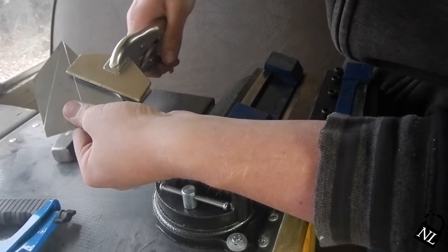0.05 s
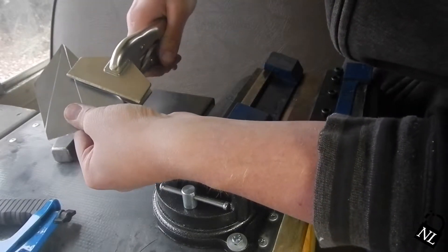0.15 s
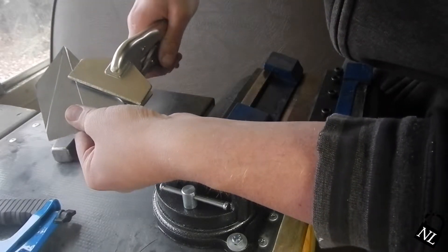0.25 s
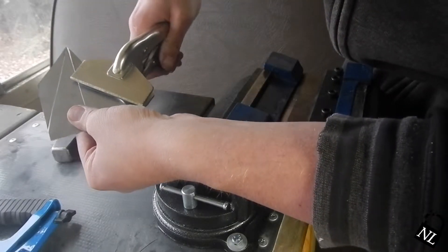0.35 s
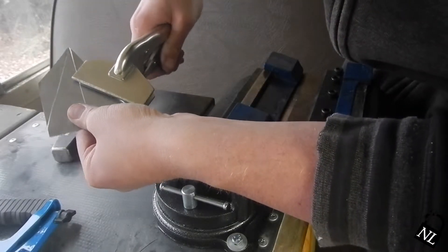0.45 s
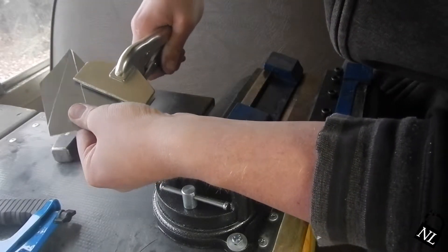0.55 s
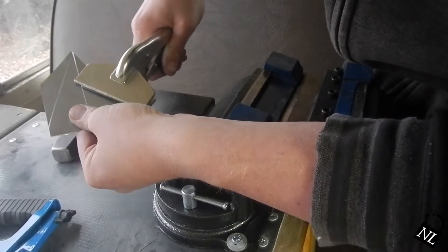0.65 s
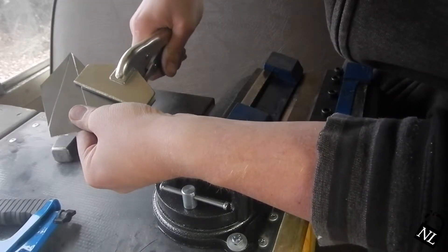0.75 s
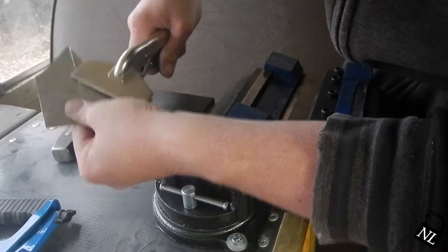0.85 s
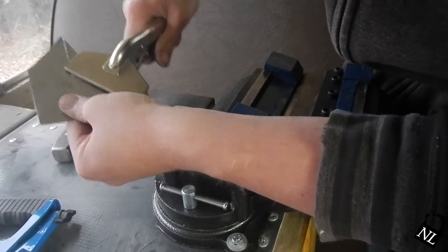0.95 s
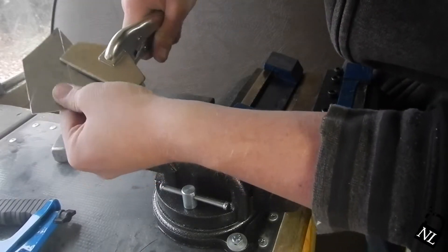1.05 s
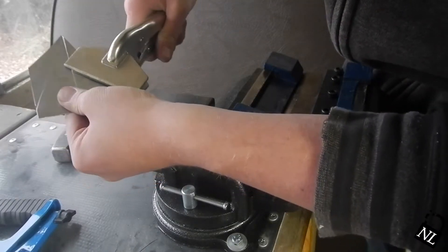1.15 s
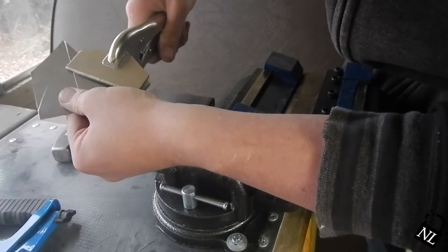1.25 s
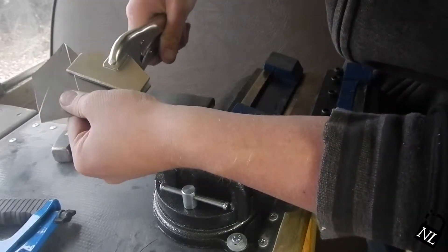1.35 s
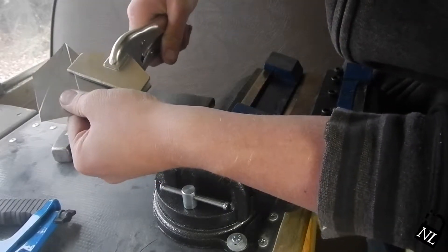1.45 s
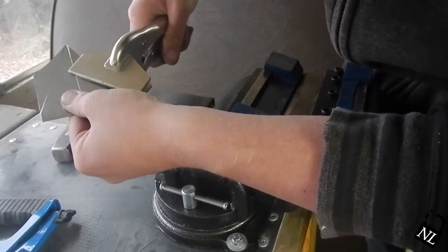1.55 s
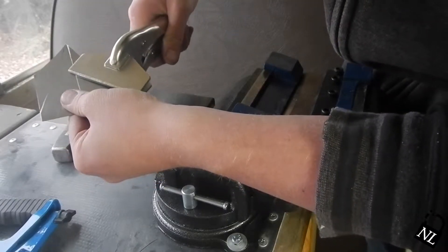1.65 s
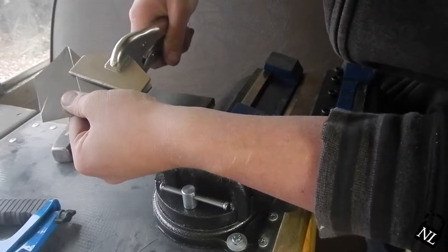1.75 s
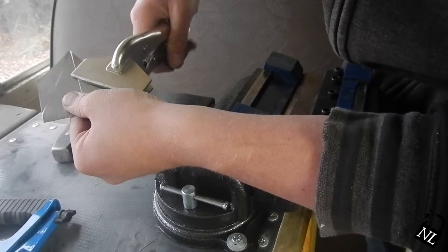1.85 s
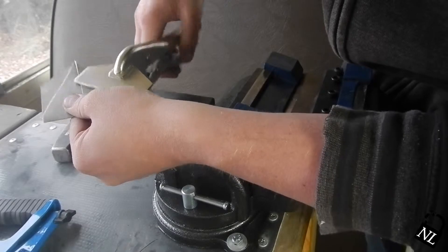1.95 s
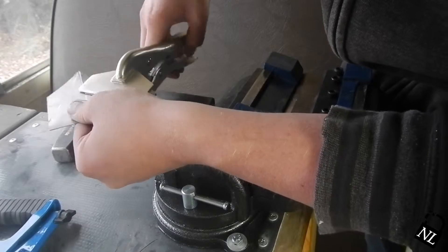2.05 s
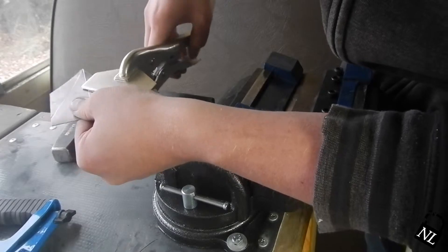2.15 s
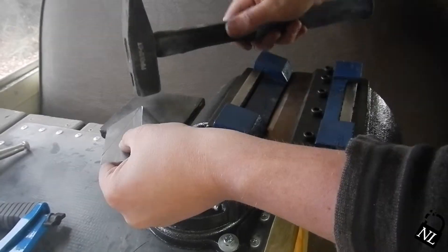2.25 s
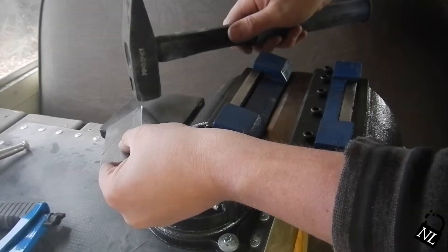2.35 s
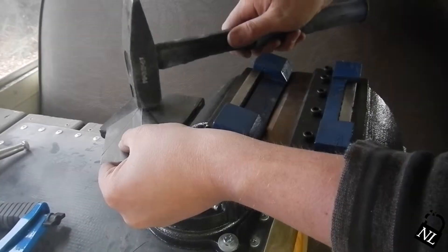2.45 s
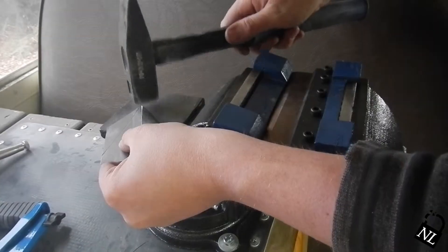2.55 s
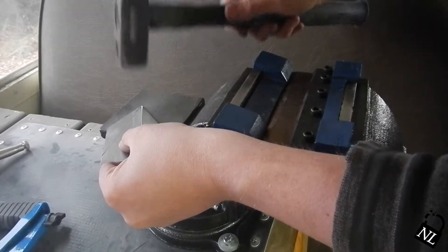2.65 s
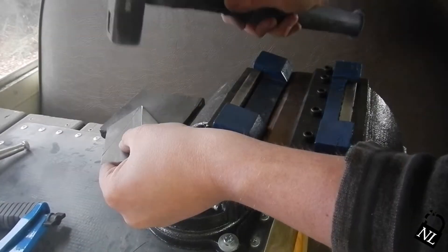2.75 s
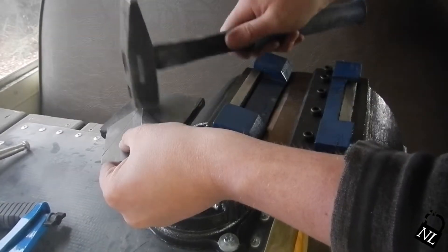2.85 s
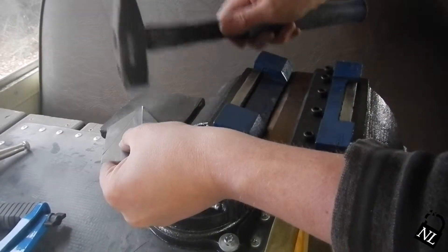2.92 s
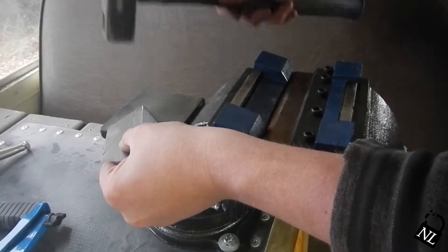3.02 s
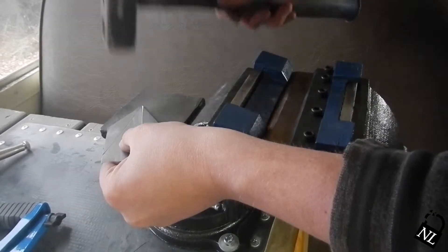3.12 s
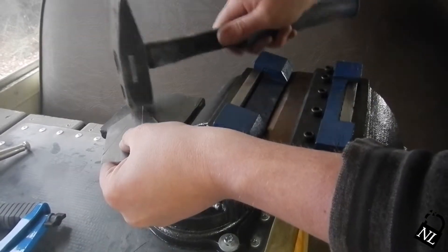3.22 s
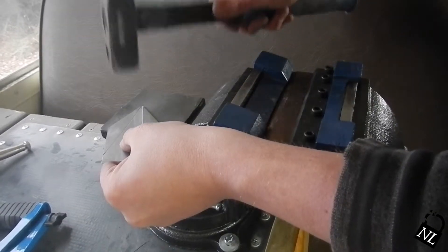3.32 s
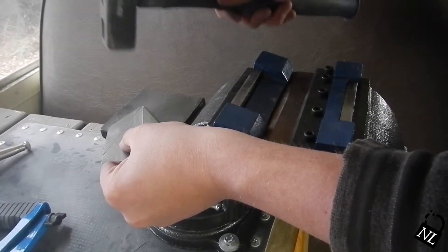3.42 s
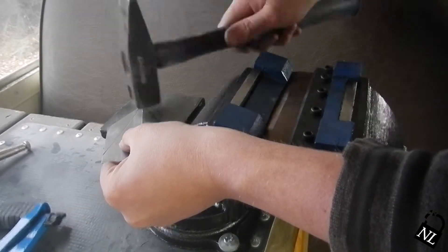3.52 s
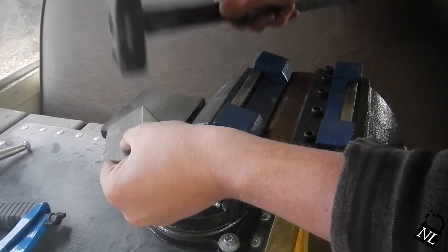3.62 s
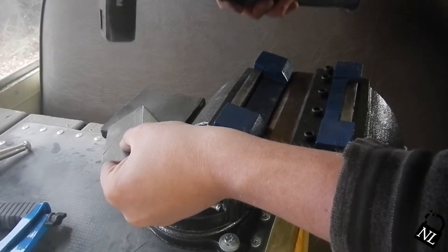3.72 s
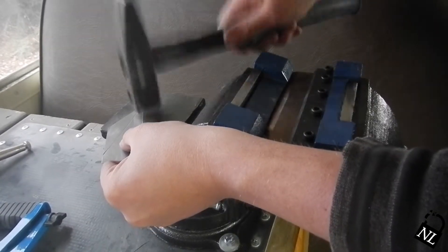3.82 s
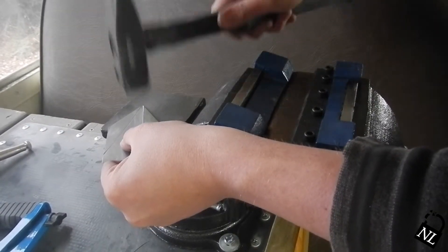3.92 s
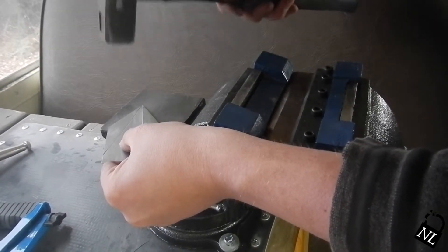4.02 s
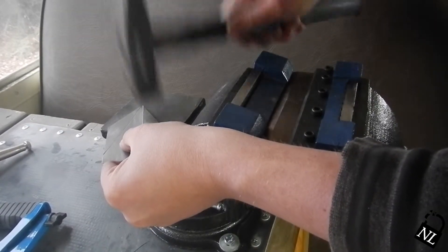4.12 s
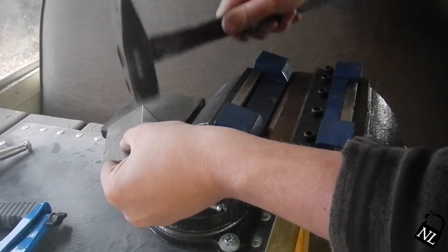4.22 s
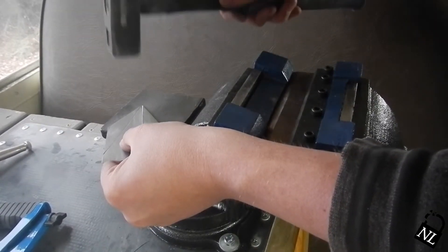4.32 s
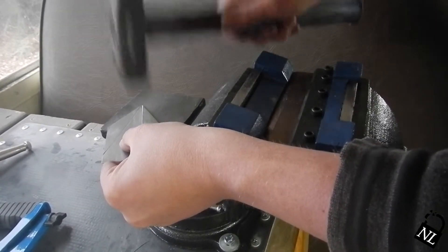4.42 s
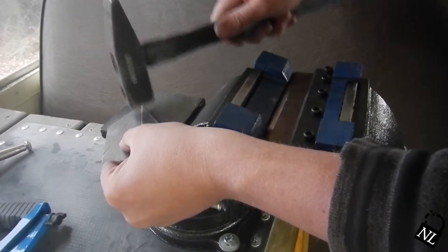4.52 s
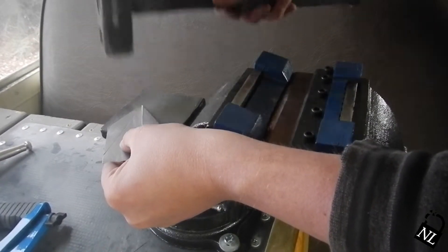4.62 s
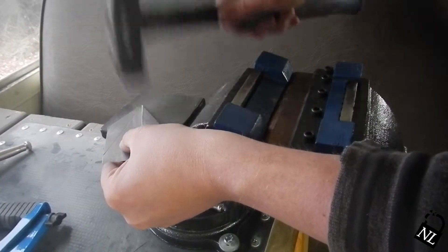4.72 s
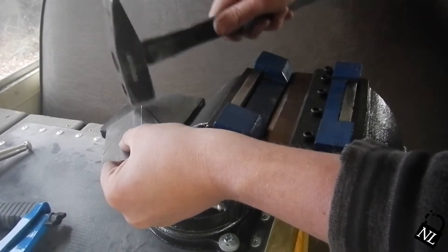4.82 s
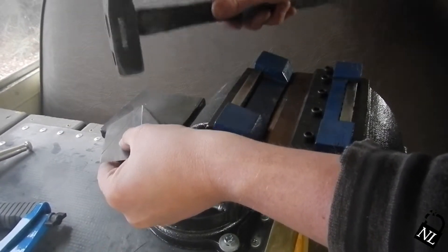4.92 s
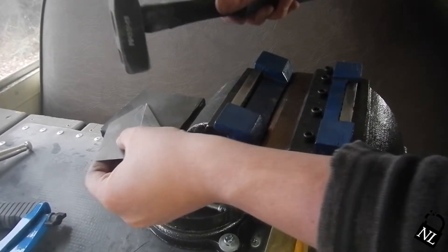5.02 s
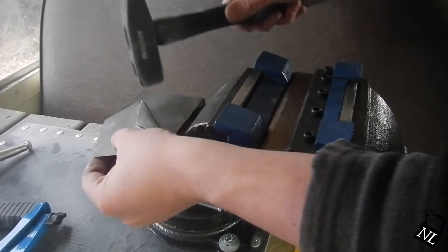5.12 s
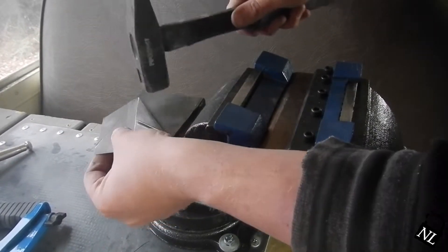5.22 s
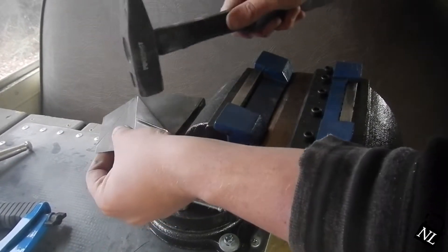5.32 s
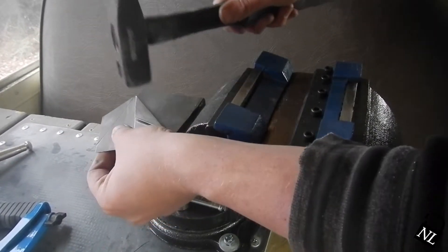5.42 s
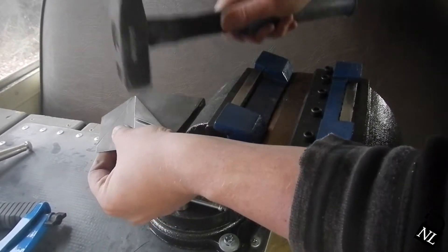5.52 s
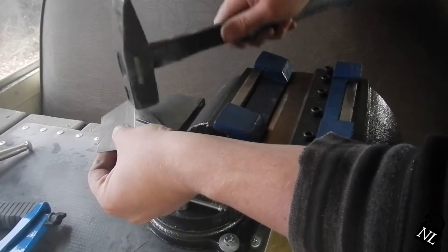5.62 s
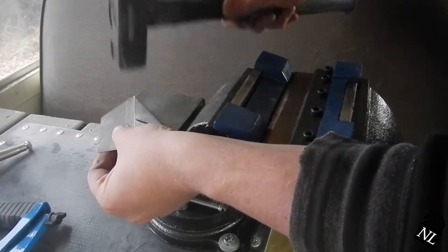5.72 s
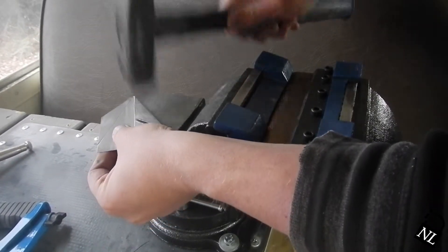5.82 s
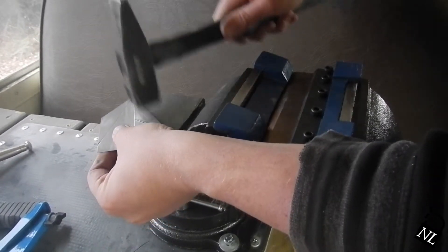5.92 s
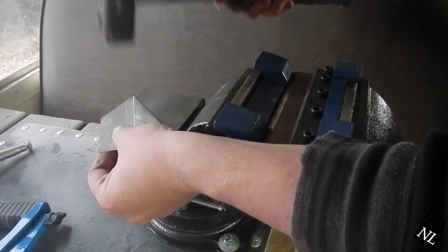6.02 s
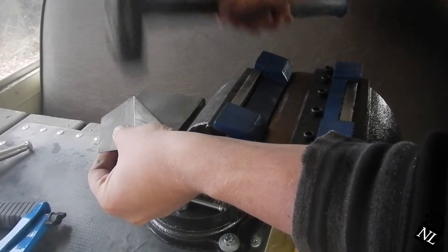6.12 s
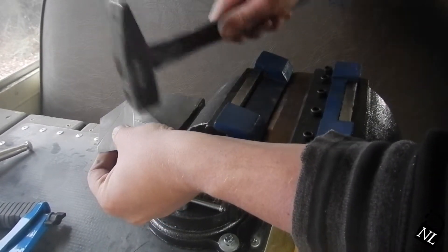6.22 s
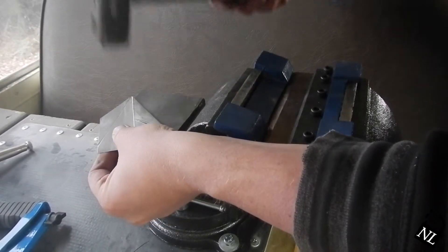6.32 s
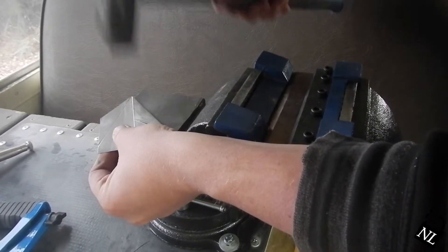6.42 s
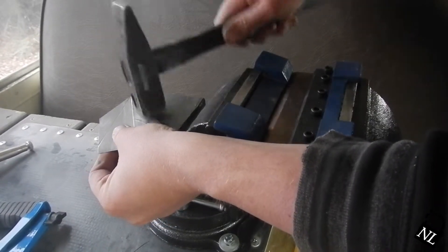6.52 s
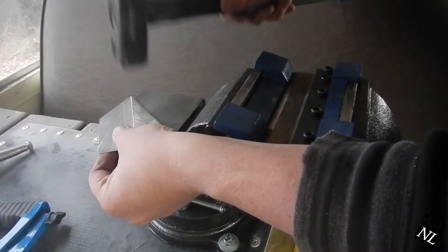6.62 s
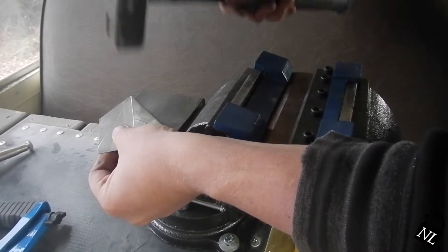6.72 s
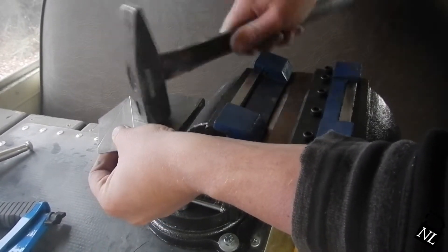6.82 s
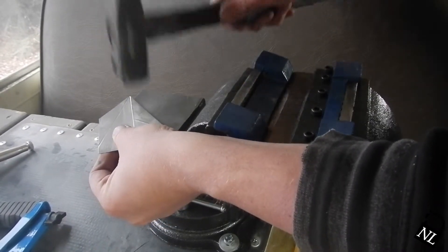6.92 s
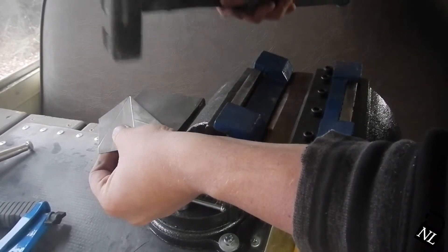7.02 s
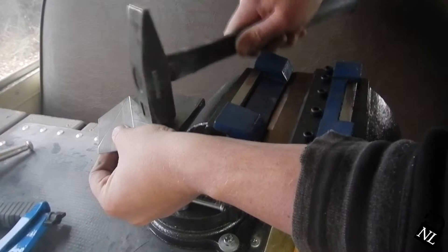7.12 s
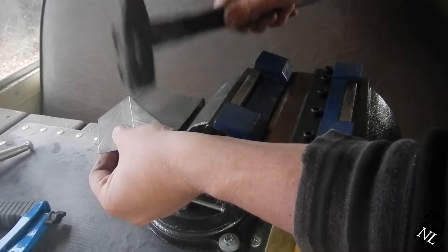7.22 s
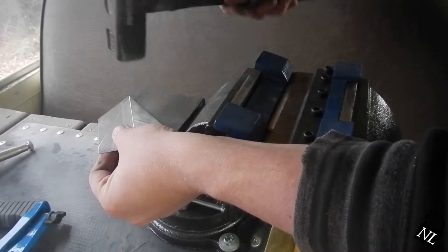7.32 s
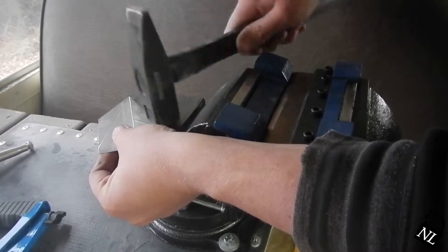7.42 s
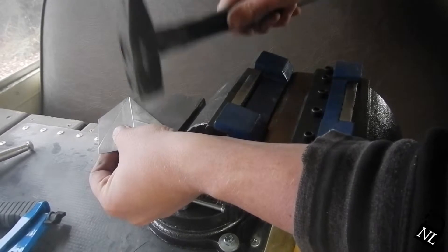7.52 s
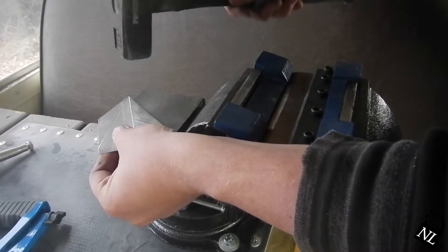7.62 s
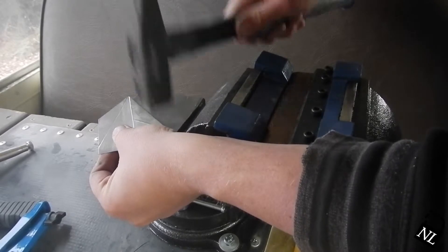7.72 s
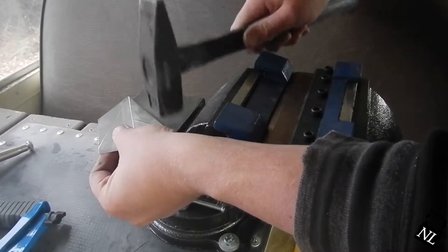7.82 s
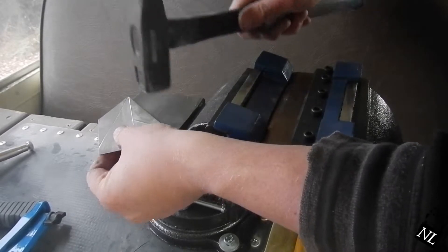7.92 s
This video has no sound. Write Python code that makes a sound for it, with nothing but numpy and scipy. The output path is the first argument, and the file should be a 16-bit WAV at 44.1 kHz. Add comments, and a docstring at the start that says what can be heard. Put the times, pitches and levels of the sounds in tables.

```python
"""Hammering sheet steel on a vise

Pliers tick and snap open, a folded sheet is handled onto a vise, then hammered in two runs of seven blows,
with three lighter touches. Each contact is a noise clack, decaying vise modes, a zing of the sheet and a bench
thump; decaying noise answers as a small workshop. The camera's gain control ducks at loud blows and creeps
back, moving the hiss and a thin electronic whine with it; a faint fluttering tone sags as the second run starts.
"""
import sys
import numpy as np
from scipy import signal
from scipy.fft import rfft, irfft, next_fast_len
from scipy.io import wavfile
from scipy.ndimage import uniform_filter1d, minimum_filter1d

SR = 44100
rng = np.random.default_rng(int(sys.argv[2]) if len(sys.argv) > 2 else 0)


def inscribe(sig):
    """Save sig as 16-bit PCM at rate SR to the path in sys.argv[1].

    A 1-D sig is mono; a 2-D sig holds one channel per row.
    Samples are clipped to [-1, 1] before scaling.
    """
    pcm = np.round(np.clip(np.atleast_2d(sig).T, -1, 1) * 32767)
    wavfile.write(sys.argv[1], SR, pcm.astype(np.int16))


N = 351036
TIME = np.arange(N) / SR
# Low rumble spectrum. Each row: frequency in Hz, relative density in dB per Hz.
RUMBLE_SPECTRUM = [(20, -13), (45, 4.5), (70, 4.5), (110, -8.5), (180, -8), (300, -26), (900, -27),
                   (3000, -72.5)]


def amp(db):
    """Amplitude ratio of a level in dB."""
    return 10 ** (np.asarray(db) / 20)


def unit(x):
    """Scale to rms 1."""
    return x / np.sqrt(np.mean(x ** 2) + 1e-20)


def along(points, hz):
    """Interpolate (Hz, value) points on a log frequency axis."""
    point_hz, value = np.transpose(points)
    return np.interp(np.log(hz + 1), np.log(point_hz + 1), value)


def filtered(x, response):
    """Multiply the spectrum of x by a response of frequency, zero-padded."""
    n = x.shape[-1]
    padded = next_fast_len(n + 4096)
    hz = np.fft.rfftfreq(padded, 1 / SR)
    return irfft(rfft(x, padded) * response(hz), padded)[..., :n]


def noise(spectrum, shape):
    """Gaussian noise shaped to a spectrum, rms 1."""
    white = rng.standard_normal(shape)
    return unit(filtered(white, lambda hz: amp(along(spectrum, hz))))


def fade(t, t60_s):
    """Exponential decay, 60 dB in t60_s."""
    return np.exp(-np.log(1000) * t / t60_s)


def swell(t, rise_s, t60_s):
    """Soft exponential rise under a decay."""
    return (1 - np.exp(-t / rise_s)) * fade(t, t60_s)


def hump(hz, centre_hz, db, width):
    """Broad resonance added to unity; width is a share of its centre."""
    return 1 + amp(db) / (1 + ((hz - centre_hz) / (width * centre_hz)) ** 2)


def ring(modes, t, scatter_db, detune):
    """Sum of damped sines from near rms 1; strengths and pitches scatter per contact."""
    hz, db, t60_s = np.transpose(modes)[:, :, None]
    size, shift, phase = rng.standard_normal((3, len(modes), 1))
    gain = amp(db + scatter_db * size)
    waves = np.sin(2 * np.pi * (hz * (1 + detune * shift) * t + phase))
    return np.sum(gain * waves * fade(t, t60_s), axis=0) / np.sqrt(np.sum(gain ** 2) / 2)


def spread(make, side_db):
    """Two draws of a sound as the common and the opposed part of the ports."""
    return make() + amp(side_db) * make() * np.array([[1], [-1]])


def add(track, start_s, sound):
    """Mix a sound in at start_s, cut at the track's end."""
    part = track[:, round(start_s * SR):][:, :sound.shape[-1]]
    part += sound[..., :part.shape[1]]


def in_workshop(sound, wet_db, close=0):
    """Direct sound at two ports plus a diffuse noise tail; the close part reaches the room more weakly."""
    # Each row: frequency in Hz, decay t60 in s.
    room_t60 = [(100, 0.7), (300, 0.24), (700, 0.27), (1500, 0.35), (4300, 0.35), (7000, 0.27),
                (12000, 0.24), (15000, 0.22)]
    # Each row: frequency in Hz, relative tail level in dB.
    room_colour = [(100, 6.5), (600, 3), (1500, 1.5), (3500, -6), (6500, -4), (12000, -5), (14000, -8.5)]
    # Each row: frequency in Hz, side minus mid in dB.
    room_side = [(100, 4), (400, -18.5), (1000, -14.5), (2400, -10), (4400, -5), (8000, 0.5)]
    # Each row: frequency in Hz, phase by which left leads in radians.
    port_phase = [(1000, 0.17), (4000, .5), (7000, 0.65), (8000, 1.4), (10700, 2.2), (12300, 0.34),
                  (13700, -2.1)]
    close_db, build_s = -7, 0.004

    hz, t, bins = signal.stft(rng.standard_normal((2, SR * 5 // 8)), SR, nperseg=256)
    decay = fade(t, along(room_t60, hz)[:, None])
    mid, side = signal.istft(bins * decay, SR, nperseg=256)[1]
    side = filtered(side, lambda f: amp(along(room_side, f)))
    build_up = 1 - np.exp(-np.arange(len(mid)) / SR / build_s)
    tail = np.array([mid + side, mid - side]) * build_up
    tail = filtered(tail / np.linalg.norm(mid), lambda f: amp(wet_db + along(room_colour, f)))

    heard = signal.fftconvolve((sound + amp(close_db) * close)[None], tail, axes=1)
    half_lead = np.array([[0.5], [-0.5]])
    add(heard, 0, filtered(sound + close, lambda f: np.exp(1j * half_lead * along(port_phase, f))))
    return heard


def background():
    """Two-channel noise hiss, a steady sine whine, and a sagging sine with amplitude flutter."""
    # Each row: frequency in Hz, relative density in dB per Hz.
    hiss_spectrum = [(15, -37), (25, -7), (68, 0), (286, -4), (632, -10), (916, -4), (1260, -12),
                     (1400, -8), (2250, -17), (11900, -25), (14000, -32)]
    whine_hz = 14835.3
    start_s, end_s, attack_s, release_s = 5.23, 5.93, 0.1, 0.08
    start_hz, sag_hz_per_s, waver_hz = 1470, 160, 35

    since_s = TIME - start_s
    held = np.clip(np.minimum(since_s / attack_s, (end_s - TIME) / release_s), 0, 1)
    waver = unit(uniform_filter1d(rng.standard_normal(N), size=300))
    tone_hz = start_hz - sag_hz_per_s * since_s + waver_hz * waver
    flutter_hz = 50 + 12 * waver
    flutter = 1 + 0.7 * np.sin(2 * np.pi * np.cumsum(flutter_hz) / SR)
    tone = amp(-41.5) * held * flutter * np.sin(2 * np.pi * np.cumsum(tone_hz) / SR)

    whine = amp(-54.5) * np.sin(2 * np.pi * whine_hz * TIME)
    hiss = amp(-52.3) * noise(hiss_spectrum, (2, N))
    return hiss + whine + tone


def handling():
    """Hand bumps on the vise rumble; the sheet rubs as it catches and scrapes as it slides."""
    # Hand bumps. Each row: start in s, level in dB.
    bumps = [(2.335, -31), (2.489, -29.5), (2.543, -29), (2.624, -39.5)]
    # Sheet catching under the fingers. Each row: start in s, level in dB.
    catches = [(2.339, -38.5), (2.378, -35.5), (2.57, -41.5), (2.712, -41), (3.073, -31)]
    # Sheet sliding on the vise. Each row: start in s, level in dB, fade t60 in s.
    slides = [(2.233, -36.5, 0.024), (3.709, -18.5, .08), (5.06, -28, 0.49), (5.172, -18.5, 0.11)]
    # Dull rub. Each row: frequency in Hz, relative density in dB per Hz.
    rub_spectrum = [(200, -12.5), (700, -20.5), (950, -5), (1130, -15), (1380, -3), (1750, -12.5),
                    (3000, -23), (14000, -40.5)]
    # Sheet dragged over steel. Each row: frequency in Hz, relative density in dB per Hz.
    scrape_spectrum = [(1000, -33), (2500, -0.5), (3250, -5), (3900, -28), (4700, -4), (5500, -22.5),
                       (6700, 4.5), (7800, -16), (9000, -15.5), (16000, -21)]
    bump_rise_s, bump_t60_s, bump_rub_db = 0.0082, 0.34, -12.5
    catch_rise_s, catch_t60_s = 0.004, 0.09
    slide_rub_db, slide_rise_share = -5.5, 0.15  # rise as a share of the fade t60

    out, t = np.zeros((2, N)), np.arange(SR // 2) / SR
    for start_s, db in bumps:
        rumble = spread(lambda: noise(RUMBLE_SPECTRUM, len(t)), side_db=0.5)
        bump = rumble + amp(bump_rub_db) * noise(rub_spectrum, len(t))
        add(out, start_s, amp(db) * bump * swell(t, bump_rise_s, bump_t60_s))
    for start_s, db in catches:
        rub = noise(rub_spectrum, len(t)) * swell(t, catch_rise_s, catch_t60_s)
        add(out, start_s, amp(db) * in_workshop(rub, wet_db=-2))
    for start_s, db, t60_s in slides:
        scrape = noise(scrape_spectrum, len(t)) + amp(slide_rub_db) * noise(rub_spectrum, len(t))
        scrape = scrape * swell(t, slide_rise_share * t60_s, t60_s)
        add(out, start_s, amp(db) * in_workshop(scrape, wet_db=-17))
    return out


def pliers():
    """Jaws tick, then spring open in a double snap: noise clicks, a jaw mode and a faint one-second ring."""
    # Each row: start in s, relative level in dB, brightest frequency in Hz.
    clicks = [(0.0666, -37, 7700), (0.2542, -30, 6460), (0.463, -47.5, 5560), (0.8144, -46.5, 7970),
              (0.8609, 8, 3300), (0.8642, 8, 1883)]
    # Each row: frequency in Hz, relative density in dB per Hz.
    snap_spectrum = [(100, -18.5), (900, -14.5), (1400, -6.5), (1950, 3.5), (2600, -1), (3300, 0.5),
                     (4500, -3.5), (6000, 1), (8000, -1.5), (9600, -3.5), (11600, -1), (13400, -22.5),
                     (15000, -14.5)]
    # Each row: mode frequency in Hz, relative level in dB, t60 in s.
    plier_modes = [(1750, -9, 4.2), (2310, 1, 1.3), (3460, -8.5, 0.61), (4060, -8, 0.49),
                   (7400, -3.5, 0.93), (8230, -14, 0.31)]
    click_t60_s, jaw_db, jaw_t60_s, attack_s = 0.028, -9, 0.023, 0.0003

    out, t, ring_t = np.zeros((2, N)), np.arange(SR // 12) / SR, np.arange(SR) / SR
    attack = 1 - np.exp(-t / attack_s)
    for start_s, db, bright_hz in clicks:
        snap = noise(snap_spectrum, len(t))
        snap = unit(filtered(snap, lambda hz: hump(hz, bright_hz, db=2, width=0.08)))
        jaw = amp(jaw_db) * ring([(bright_hz, 0, jaw_t60_s)], t, scatter_db=0, detune=0)
        click = (snap * fade(t, click_t60_s) + jaw) * attack
        add(out, start_s, amp(db + 7.5) * in_workshop(click, wet_db=-12.5))
        add(out, start_s, amp(db - 55.5) * ring(plier_modes, ring_t, scatter_db=1, detune=0))
    return out


def thump():
    """Heavy bench swells into its damped modes; loose things thud on it and a low rumble lingers."""
    # Each row: mode frequency in Hz, relative level in dB, t60 in s.
    bench_modes = [(49.4, -11, 0.2), (71, -4, 0.36), (108.7, 1, 0.23), (120.7, -5.5, 0.49),
                   (177.8, 1, 0.21), (203, 2, 0.27), (230.5, -2.5, 0.35), (289.3, -4.5, 0.31),
                   (489.5, -4.5, 0.26)]
    # Loose things on the bench. Each row: frequency in Hz, relative density in dB per Hz.
    thud_spectrum = [(25, -15.5), (65, -1), (120, 2), (220, -4.5), (380, -12), (680, -12.5), (1000, -19),
                     (2500, -62)]
    t = np.arange(SR) / SR
    modes = amp(-1) * ring(bench_modes, t, scatter_db=1, detune=0.015)
    thud = amp(-0.5) * noise(thud_spectrum, len(t)) * fade(t, 0.29)
    rumble = amp(-19) * noise(RUMBLE_SPECTRUM, len(t)) * fade(t, 1.0)
    return (modes + thud + rumble) * (1 - np.exp(-t / 0.00085))


def hammer():
    """Steel on steel: noise crack and clack with a rebound slap, sheet zing, vise modes and bench thump."""
    # Contacts on the vise. Each row: start in s, relative force in dB, relative vise ring in dB,
    # relative sheet zing in dB, tilt in dB per octave, resonance of the struck spot in Hz.
    blows = [(2.4783, -20.5, -11.5, -10.5, 2, 3110), (2.8141, -45.5, -9, -15.5, -6.5, 3320),
             (2.8682, 10, -15.5, 9, 0.6, 1225), (3.2141, 21, -5.5, -6.5, 2.33, 1540),
             (3.5279, 26, -7, -5.5, 1.7, 2780), (3.85, 27, -5, -2, -0.04, 2850),
             (4.1613, 29.5, -0.5, -7, 2.05, 4110), (4.4742, 24, -0.5, -2, 1.5, 4200),
             (4.7749, 29, -4, -7.5, 3, 4460), (5.5891, 14, -11.5, -1.5, 3.5, 1354),
             (5.8803, 13.5, -11.5, 0.5, 5.5, 2860), (6.183, 26, -4, -2.5, 3.5, 3940),
             (6.5008, 27, -6, -9.5, 3, 4360), (6.8144, 20.5, -8, -6, 2.7, 1640),
             (7.124, 26, -10, -2, 2, 3460), (7.4402, 22, -13, -5.5, 4.5, 3300),
             (7.8047, -2.5, -14, 3, 6, 3050)]
    # Each row: frequency in Hz, relative density in dB per Hz.
    clack_spectrum = [(60, -11.5), (300, -4), (450, -8.5), (720, 4), (1050, -3.5), (1450, 3.5),
                      (2300, -0.5), (3800, -3.5), (5400, -6.5), (7800, -10.5), (10000, -12), (12000, -11),
                      (13500, -22.5), (15000, -9)]
    # Each row: frequency in Hz, relative density in dB per Hz.
    zing_spectrum = [(1000, -40), (3200, -15), (5300, -17), (6000, -6), (6600, 0), (7150, -7), (8200, -16),
                     (11800, -13), (16000, -30)]
    # Vise with the sheet on it. Each row: mode frequency in Hz, relative level in dB, t60 in s.
    vise_modes = [(668, -8, .07), (1224, -8, .07), (1410, -6, .04), (1505, -5, .04), (1678, -4, .06),
                  (1835, -2, .06), (2070, -8, .04), (2670, -1, .035), (2860, -6, .03), (3168, -5, .08),
                  (3552, -2, .08), (3852, -6, .05), (4232, 2, .06), (4410, -4, .035), (4842, -9, .06),
                  (5008, -7, .05), (5835, -7, .06)]
    # A squarer blow rings more and clacks longer: t60 at 0 dB ring, dB per dB.
    clack_t60_s, clack_lengthens = 0.094, 0.98
    # Thump at 0 dB force, dB per dB of force; cap relative to force, for light touches.
    thump_db, thump_grows, thump_light_db = -5, 0.34, -13
    # Spot resonance at 0 dB force; harder blows swamp it, dB per dB.
    spot_db, spot_fades = 2, 0.12

    out, t = np.zeros((2, N)), np.arange(SR // 8) / SR
    attack = 1 - np.exp(-t / 0.0006)
    for start_s, force_db, ring_db, zing_db, tilt_db, spot_hz in blows:
        # the sheet springs up and slaps the vise again about 5 ms later
        since_slap_s = t - rng.uniform(0.0052, 0.0053)
        slap = amp(-4) * (since_slap_s > 0) * fade(np.abs(since_slap_s), 0.0062)
        body = amp(-7) * fade(t, clack_t60_s * amp(clack_lengthens * ring_db))
        crack = amp(0.5) * fade(t, 0.017)
        clack = noise(clack_spectrum, len(t)) * (body + crack + slap)
        spot_gain_db = spot_db - spot_fades * force_db
        clack = filtered(clack, lambda hz: hump(hz, spot_hz, db=spot_gain_db, width=0.06))
        clack = filtered(clack, lambda hz: amp(tilt_db * np.log2((hz + 300) / 3500)))

        zing = amp(zing_db + 0.5) * noise(zing_spectrum, len(t)) * fade(t, 0.031)
        vise = amp(ring_db + 1.5) * ring(vise_modes, t, scatter_db=2, detune=0.002)
        # the clack fills the room; the ringing is heard mostly from close by
        strike = in_workshop(clack * attack, wet_db=-4, close=(vise + zing) * attack)
        add(out, start_s, amp(force_db - 0.5) * strike)
        push_db = min(thump_db + thump_grows * force_db, force_db + thump_light_db)
        add(out, start_s, amp(push_db) * spread(thump, side_db=-7.5))
    return out * amp([[0.3], [-0.3]])  # dB, left slightly louder


def scene():
    """Sum of all sources, two channels."""
    return background() + handling() + pliers() + hammer()


def gain_control(x, threshold_db=-18, share=0.89, release_db_per_s=16):
    """Duck at once by a share of the excess level, then recover at a constant dB rate."""
    power = np.abs(uniform_filter1d(np.mean(x ** 2, axis=0), size=176))  # 4 ms
    excess_db = np.maximum(10 * np.log10(power + 1e-12) - threshold_db, 0)
    recovery_db = release_db_per_s * TIME
    duck_db = np.maximum.accumulate(share * excess_db + recovery_db) - recovery_db
    gain_db = minimum_filter1d(-duck_db, size=260)  # widen ducks by 3 ms each way
    return x * amp(uniform_filter1d(gain_db, size=88))  # smooth over 2 ms


def record(dry):
    """The camera rides its gain, then cuts steeply above its band limit."""
    top_hz = 15700
    return filtered(gain_control(dry), lambda hz: 1 / np.sqrt(1 + (hz / top_hz) ** 160))


dry = scene()
out = record(dry)
inscribe(out)
```